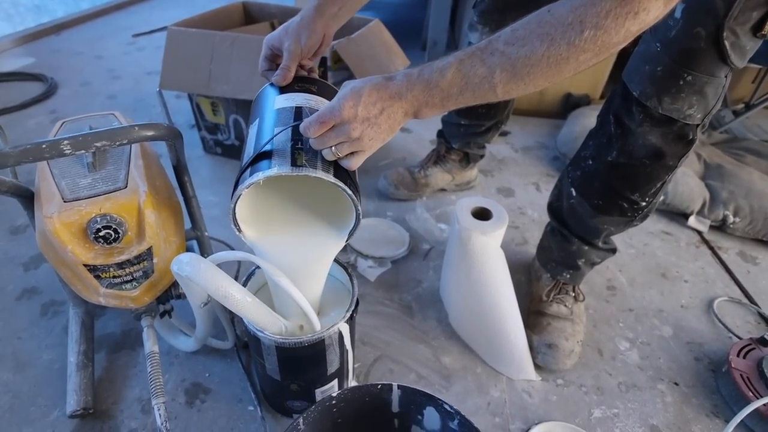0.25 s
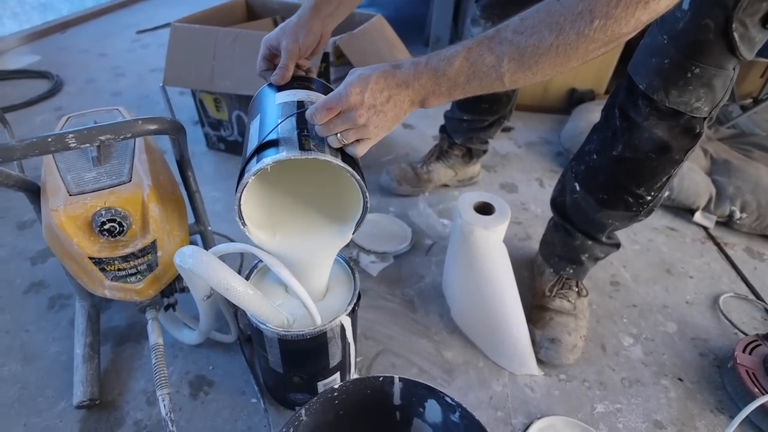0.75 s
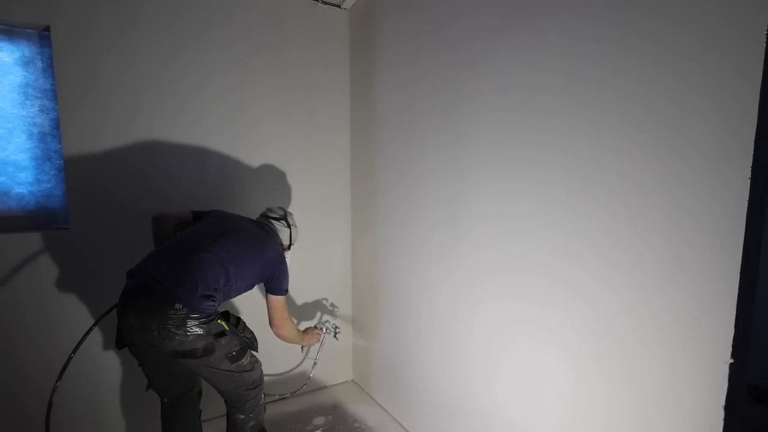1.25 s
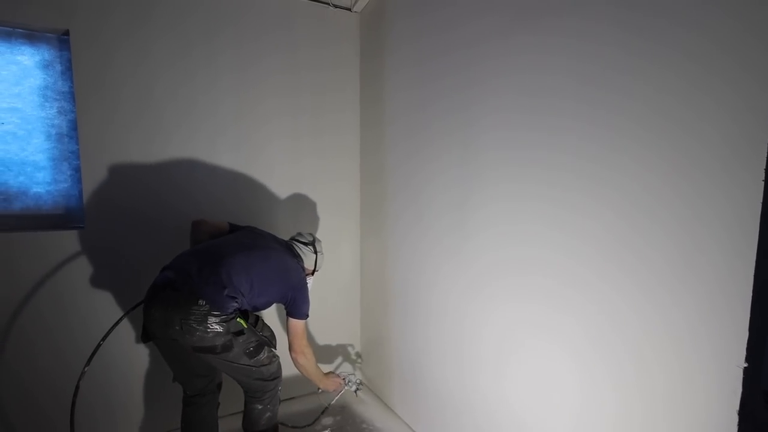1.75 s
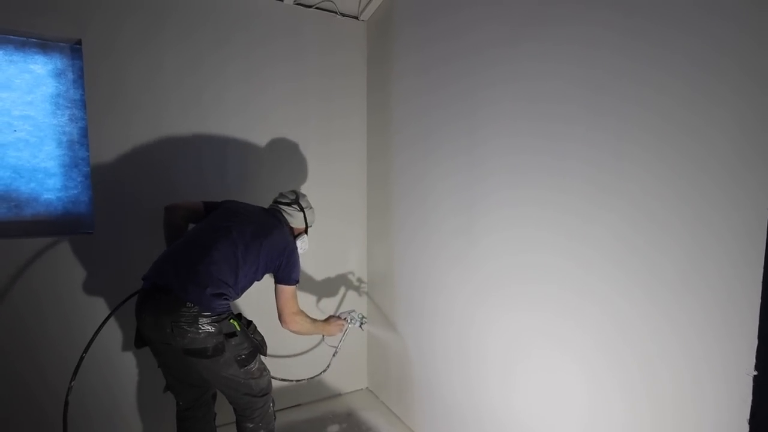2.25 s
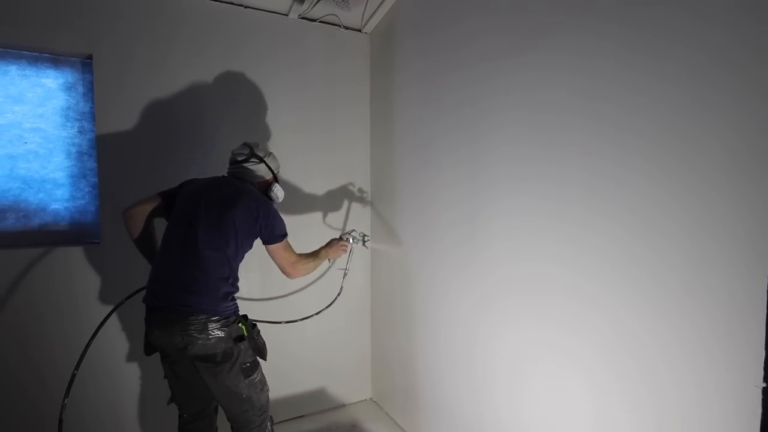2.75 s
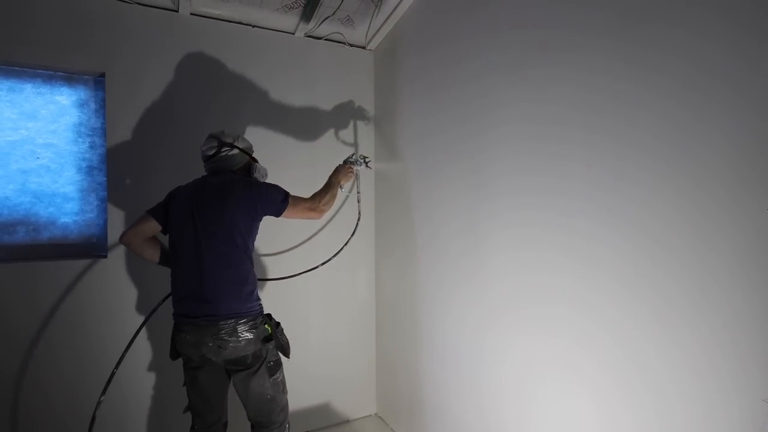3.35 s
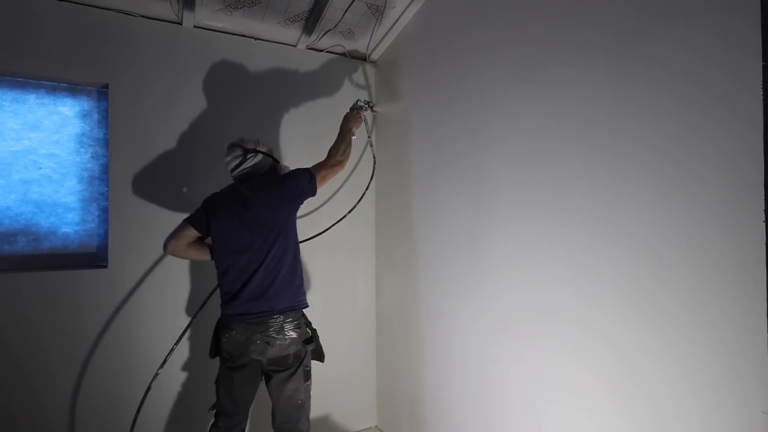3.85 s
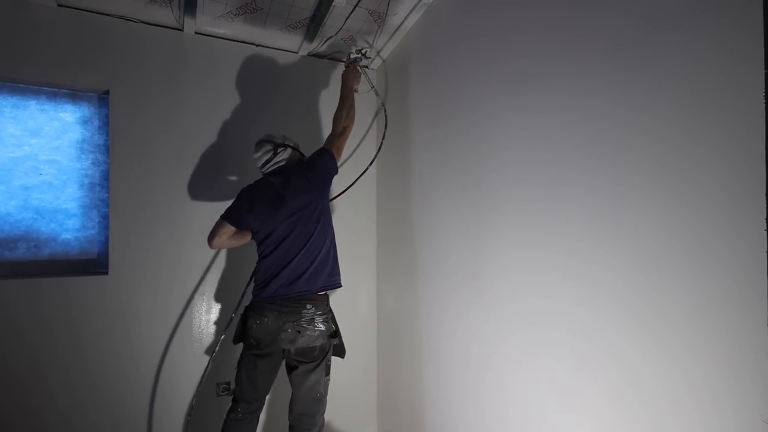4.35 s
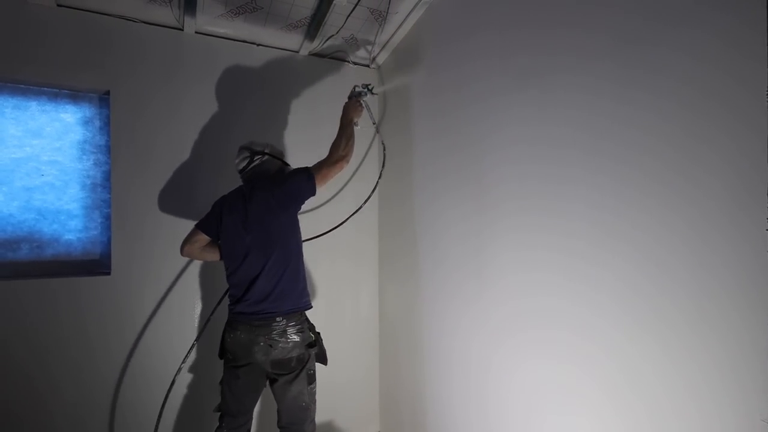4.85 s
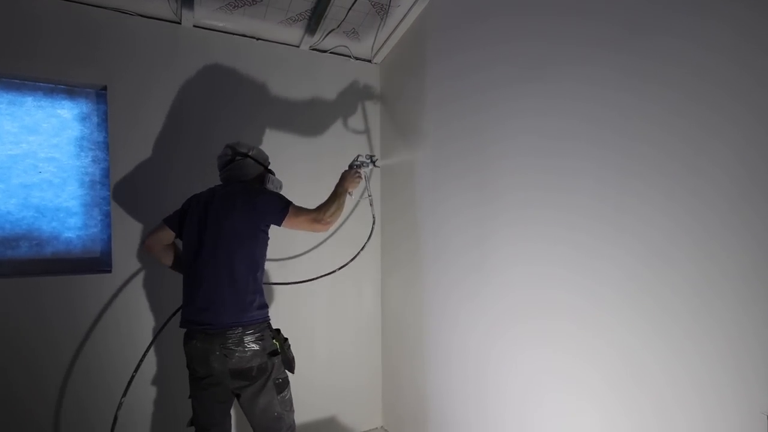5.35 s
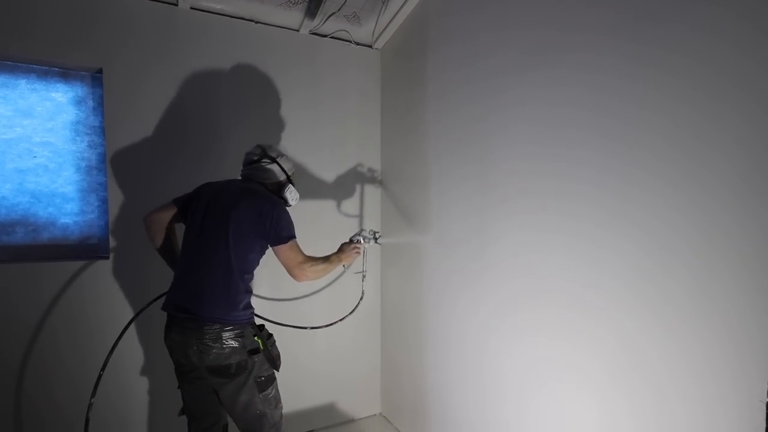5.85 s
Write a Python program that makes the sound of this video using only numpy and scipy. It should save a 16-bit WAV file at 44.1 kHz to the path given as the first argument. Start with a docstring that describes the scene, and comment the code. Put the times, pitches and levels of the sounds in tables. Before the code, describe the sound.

It opens very quietly, with a faint room hum and low rumble. A can gives one tiny tick at about 0.5 seconds, and paint slithers out almost inaudibly. At 0.9 seconds a spray gun cuts in abruptly, much louder: a bright, airy hiss that continues unbroken to the end at about 6 seconds, swelling and sinking slightly as the gun sweeps the wall. Beneath it a geared piston pump cycles. Each run begins with a small clatter, spins up into a hum with a fast rattle and gear whine, then coasts down in half a second. The pump runs from 1.3 to 2.8 seconds, from 3.4 to 4.8, and from 5.4 onward. Brief, high, raspy squeaks come at 2.9 and 4.9 seconds, with a softer one at 5.4. The sound is mono, with a short bare-room echo on the rattle.

```python
"""An airless gun sprays a wall: its jet tears paint into mist and hisses without a pause.
Its geared piston pump spins up, hums and rattles for about a second and a half, then coasts to rest,
several times over, now and then with a small squeak. Before the spraying cuts in abruptly,
paint is poured almost silently in a humming room."""
import sys
import numpy as np
from scipy import signal
from scipy.fft import rfft, irfft
from scipy.io import wavfile
from scipy.ndimage import uniform_filter1d

SR = 44100
rng = np.random.default_rng(int(sys.argv[2]) if len(sys.argv) > 2 else 0)


def waveform_to_disk(signal):
    """Save audio, clipped to [-1, 1], as 16-bit WAV at the path in sys.argv[1]."""
    frames = np.transpose(np.atleast_2d(signal))
    scaled = np.clip(frames, -1, 1) * 32767
    samples = np.round(scaled).astype(np.int16)
    wavfile.write(sys.argv[1], SR, samples)


N = 269010
T = np.arange(N) / SR
SPRAY_START_S = 0.8855
FULL_SPEED = 18.4  # crank turns per second

# Set times at which the pump tops up the paint pressure.
# Each row: motor on in seconds, motor off in seconds, level of the starting jolt in dB.
PUMP_RUNS = [(-.8, .68, -43), (1.27, 2.82, -48), (3.371, 4.838, -42), (5.376, 6.85, -40.5)]
# The strong tones of crank, motor and gears. Each entry: vibrations per turn of the crank.
TONE_MULTIPLES = [3, 5, 8, 9, 10, 12, 16, 22, 24, 28, 29, 48, 61, 119, 120, 122]
# A small machine gives off little bass. Each row: frequency in Hz, gain in dB.
BASS_LOSS = [(20, -32), (40, -26), (75, -18), (120, -12.5), (165, -3), (200, -5.5), (260, 0), (400, -2)]


def jet(boost_db=3.0, patchy_db=0.93, flutter_db=0.29, echo_gain=0.21):
    """The churning fan of paint hisses; an echo off the wall tints the hiss as the gun moves."""
    # The tone colour of the hiss. Each row: frequency in Hz, relative level in dB.
    hiss_spectrum = [(40, -29), (160, -18), (500, -16.5), (1500, -12), (2800, -8.5), (4000, -5.5),
                     (5200, -2), (6800, -0.45), (8100, 2), (8950, -0.5), (10200, -5.5), (12200, -5),
                     (13700, -7), (15700, -13)]
    hz, t, noise = signal.stft(rng.standard_normal(N), SR, nperseg=512, noverlap=384)
    sweep_db, fizz_db, rush_db = gun_sweep(t)
    highs_db = np.interp(hz, [8800, 10500], [0, 1])[:, None] * fizz_db
    lows_db = np.interp(hz, [4600, 6500], [1, 0])[:, None] * rush_db
    # Small random patches of pitch and time come out louder or softer.
    patches = uniform_filter1d(rng.standard_normal(noise.shape), size=7, axis=0)
    patches = unit(uniform_filter1d(patches, size=12, axis=1))
    delay_s = .0022 + 0.00029 * np.interp(t, T, drift(0.7))
    wall_echo = 1 + echo_gain * np.exp(-2j * np.pi * hz[:, None] * delay_s)
    shape_db = level_at(hiss_spectrum, hz)[:, None] + highs_db + lows_db + patchy_db * patches
    _, hiss = signal.istft(noise * wall_echo * amp(shape_db), SR, nperseg=512, noverlap=384)
    return unit(hiss[:N]) * amp(np.interp(T, t, sweep_db) + boost_db + flutter_db * drift(38))


def gun_sweep(t, fizz_lift_db=4.5, rush_base_db=-1.33, steadying=1.04, pump_lift_db=1.0):
    """The hiss swells and sinks as the gun sweeps. Gives its level, high fizz and low rush in dB."""
    # Each row: time in seconds, relative hiss level in dB, relative fizz above 10 kHz in dB.
    sweep = [(0.92, -28, -8), (0.96, -27.5, -7), (1.36, -31.5, -6.5), (1.7, -30.5, -6.5), (1.74, -32.5, -6),
             (1.75, -32.5, -7), (1.87, -29, -6.5), (2.92, -29, -6), (3.26, -31.5, -6.5), (3.52, -31, -9),
             (3.76, -32, -6), (4.9, -29, -6), (5.66, -31.5, -7.5), (6.08, -30, -6.5)]
    times, levels, fizzes = np.transpose(sweep)
    sweep_db = np.interp(t, times, levels)
    fizz_db = fizz_lift_db + np.interp(t, times, fizzes)
    swing_db = sweep_db - sweep_db[t > SPRAY_START_S].mean()
    pace = crank_speed(t) / FULL_SPEED
    # Taking the swing back out keeps the rush nearly steady; the running pump lifts it a little.
    rush_db = rush_base_db - steadying * swing_db + pump_lift_db * pace
    return sweep_db, fizz_db, rush_db


def pump(rattle_db=-35, whine_db=-47.5, gear_teeth=68, chatter=0.85):
    """The crank drives a rattle, tones and the whine of meshing gears; all grow with its speed."""
    # Each entry: level in dB at full speed of the matching tone in TONE_MULTIPLES.
    tone_levels = [-65, -77, -61, -54, -57, -49.5, -50.5, -45.5, -45.5, -50, -54.5, -53.5, -53, -51.5, -53,
                   -56]
    speed = crank_speed(T)
    pace = speed / FULL_SPEED
    turns = np.cumsum(speed * (1 + .001 * drift(15))) / SR
    rattle = amp(rattle_db) * pace ** 1.15 * gear_rattle(turns)
    tones = sum(amp(db) * pump_tone(k, speed, turns) for k, db in zip(TONE_MULTIPLES, tone_levels))
    tones *= pace ** 2.4
    whine = amp(whine_db) * pace ** 0.98 * pump_tone(gear_teeth, speed, turns, ringing=1.15)
    whine *= np.clip(speed / 6, 0, 1) ** 6  # creeping teeth no longer strike
    whine *= 1 + chatter * (1 - pace) * drift(104)  # slow, unloaded teeth chatter
    return room_echo(rattle, fade_s=0.27, echo_db=-4.5) + tones + whine


def crank_speed(t, free_speed=18.646, spin_up_s=.13, sag=.187, coast_s=.48):
    """Turns per second: the crank spins up, sags as pressure builds, then friction brings it to rest."""
    speed = np.zeros(len(t))
    for on, off, _ in PUMP_RUNS:
        driven_s = np.clip(t, on, off) - on
        running = free_speed * (1 - np.exp(-driven_s / spin_up_s)) - sag * driven_s ** 2
        coasting = np.clip(1 - (t - off) / coast_s, 0, 1) ** 1.25
        speed += running * coasting
    return speed


def gear_rattle(turns, loose_db=1.0, stroke_depth=0.11, ringing=0.6):
    """Worn teeth repeat their roughness every turn; loose parts add noise that swells on each stroke."""
    multiples = np.arange(260)
    phases = np.exp(2j * np.pi * rng.random(len(multiples)))
    one_turn = irfft(phases * ~np.isin(multiples, [0] + TONE_MULTIPLES), 8192)  # skip the strong tones
    worn = unit(np.interp(turns, np.arange(len(one_turn)) / len(one_turn), one_turn, period=1))
    loose = rng.standard_normal(N) * (1 + stroke_depth * np.cos(4 * np.pi * turns))
    # The tone colour of the rattle. Each row: frequency in Hz, relative level in dB.
    rattle_spectrum = [(150, -1.5), (400, -2.5), (600, 2), (740, -2.5), (1030, 2.5), (1330, -1),
                       (1650, -3.5), (2200, -4.5), (2800, -6), (4000, -6.5), (8000, -62)]
    hz = np.fft.rfftfreq(N, 1 / SR)
    body = amp(level_at(rattle_spectrum, hz) + level_at(BASS_LOSS, hz) + ringing * ringing_db(hz))
    return unit(unit(irfft(rfft(worn) * body, N)) + amp(loose_db) * unit(irfft(rfft(loose) * body, N)))


def pump_tone(multiple, speed, turns, ringing=1):
    """One tone that follows the crank and flares up as it passes a pitch where housing or room rings."""
    speeds = np.linspace(0, 20, num=800)
    body_db = level_at(BASS_LOSS, multiple * speeds) + ringing * ringing_db(multiple * speeds)
    gain = amp(np.interp(speed, speeds, body_db) - np.interp(FULL_SPEED, speeds, body_db))
    waver = np.interp(multiple, [3, 12, 60], [.05, .15, .3]) * drift(9)
    return np.sqrt(2) * gain * (1 + waver) * np.cos(2 * np.pi * (multiple * turns + rng.random()))


def ringing_db(hz):
    """The pump housing and the room ring at certain pitches and lift the sound near them."""
    # Each row: pitch in Hz, width in Hz, lift in dB.
    resonances = [(56, 15, 20), (95, 25, 6), (152, 41, 9.5), (236, 29, 12.5), (290, 26, 4), (405, 22, 13.5),
                  (446, 37, 16), (515, 19, 6.5), (1066, 28, 2.5), (1271, 38, 7.5), (1870, 79, 5),
                  (1950, 120, 8), (2195, 150, 0)]
    return sum(db / (1 + (2 * (hz - centre) / width) ** 2) for centre, width, db in resonances)


def start_jolts(fade_s=0.16):
    """Each start of the motor jolts the housing into a short clatter."""
    clatter = shaped_noise([(90, -20), (240, 3), (330, -9), (440, 5), (620, -14), (1500, -7), (5000, -29)])
    return clatter * sum(amp(db) * (T > on) * np.exp(-abs(T - on) / fade_s) for on, _, db in PUMP_RUNS)


def squeaks(width_hz=320, rasp=0.26):
    """Parts stick and slip as the pump changes speed: a raspy whistle that swells fast and fades."""
    # Each row: start in seconds, length in seconds, first pitch in Hz, last pitch in Hz, level in dB.
    squeals = [(2.912, 0.091, 3690, 3440, -32.5), (4.933, 0.098, 3670, 3380, -33),
               (5.373, 0.083, 3640, 3760, -37.5)]
    out = np.zeros(N)
    for start, length, first_hz, last_hz, db in squeals:
        progress = np.clip((T - start) / length, 0, 1)
        hz = first_hz + (last_hz - first_hz) * progress
        whistle = resonate(resonate(rng.standard_normal(N), hz, width_hz), hz, width_hz)
        whistle = unit(whistle * (1 + rasp * drift(160)))
        out += amp(db) * whistle * np.sin(np.pi * progress ** 0.42)
    return out


def pouring(tick_s=.547, tick_db=-56, pour_db=-73):
    """The can ticks once, and paint slithers softly out after it."""
    age = np.maximum(T - tick_s, 0)
    tick = shaped_noise([(1000, -20), (4000, -10), (7000, -3), (10000, -7), (14000, 0)])
    tick *= amp(tick_db) * (age > 0) * np.exp(-age / .005)
    slither = shaped_noise([(200, -10), (600, -5), (2000, -4), (6000, -9), (15000, -20)])
    slither *= amp(pour_db + 2.5 * drift(40)) * np.exp(-((T - .65) / .09) ** 2)
    return tick + slither


def quiet_room(hush_db=-65, waver=0.094):
    """A faint hush, a wavering hum and slow swells of low rumble."""
    # The tone colour of the hush. Each row: frequency in Hz, relative level in dB.
    hush_spectrum = [(30, -24), (80, -0.5), (125, -9), (220, -8.5), (330, -8), (450, -11), (800, -13.5),
                     (1300, -17.5), (2200, -24), (4000, -26), (9000, -27.5), (15500, -31)]
    # The tones of the hum. Each row: pitch in Hz, level in dB.
    hum_tones = [(172.5, -64), (345, -78.5)]
    # The swells of rumble. Each row: middle in seconds, half width in seconds, level in dB.
    rumbles = [(.27, .27, -65), (.81, .12, -58)]
    hush = amp(hush_db) * shaped_noise(hush_spectrum)
    hum = sum(amp(db) * np.sqrt(2) * np.sin(2 * np.pi * hz * T) * (1 + waver * drift(8))
              for hz, db in hum_tones)
    swells = sum(amp(db) * np.exp(-((T - middle) / width) ** 2) for middle, width, db in rumbles)
    rumble = swells * shaped_noise([(8, -21), (22, 1), (35, -3), (60, -21), (200, -70)])
    return hush + hum + rumble


def room_echo(x, fade_s, echo_db):
    """Bare walls add dense echoes that fall by 60 dB in fade_s; the loudness stays about the same."""
    t = T[:SR // 2]
    tail = rng.standard_normal(len(t)) * np.exp(-np.log(1000) * t / fade_s) * (t > .004)
    echoes = signal.fftconvolve(x, tail / np.linalg.norm(tail))[:N]
    return (x + amp(echo_db) * echoes) / np.hypot(1, amp(echo_db))


def amp(db):
    """Turns decibels into a gain."""
    return 10 ** (np.asarray(db) / 20)


def unit(x):
    """Scales a signal to an average strength (rms) of 1."""
    return x / np.sqrt(np.mean(x ** 2) + 1e-20)


def level_at(spectrum, hz):
    """Reads the level at any frequency between rows of frequency in Hz and level in dB."""
    row_hz, row_db = np.transpose(spectrum)
    return np.interp(np.log(hz + 1), np.log(row_hz + 1), row_db)


def shaped_noise(spectrum):
    """Noise of strength 1, coloured by rows of frequency in Hz and relative level in dB."""
    gain = amp(level_at(spectrum, np.fft.rfftfreq(N, 1 / SR)))
    return unit(irfft(rfft(rng.standard_normal(N)) * gain, N))


def drift(rate_hz):
    """A smooth random wobble of strength 1, up to about rate_hz fast."""
    times = np.linspace(0, T[-1], num=8192)
    hz = np.fft.rfftfreq(len(times), times[1])
    wobble = irfft(rfft(rng.standard_normal(len(times))) * np.exp(-(hz / rate_hz) ** 2))
    return np.interp(T, times, unit(wobble))


def resonate(x, hz, width_hz):
    """Keeps a narrow band of x around a pitch that may glide."""
    spin = np.exp(2j * np.pi * np.cumsum(hz * np.ones(len(x))) / SR)
    decay = np.exp(-np.pi * width_hz / SR)
    return 2 * (spin * signal.lfilter([1 - decay], [1, -decay], x / spin + 1e-18)).real


def scene():
    """The quiet pouring gives way at once to the spraying; both channels are the same."""
    spraying = jet() + pump() + start_jolts() + squeaks()
    mono = np.where(T < SPRAY_START_S, quiet_room() + pouring(), spraying)
    return np.array([mono, mono])


def record(dry):
    """Steeply cuts the treble above 15900 Hz."""
    low_pass = signal.firwin(511, 15900, window=("kaiser", 9), fs=SR)
    return signal.oaconvolve(dry, low_pass[None], "same")


dry = scene()
out = record(dry)
waveform_to_disk(out)
```